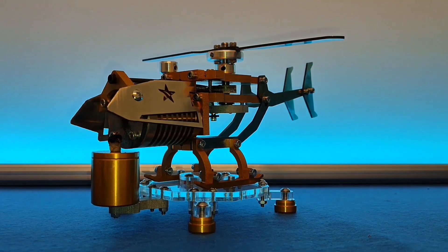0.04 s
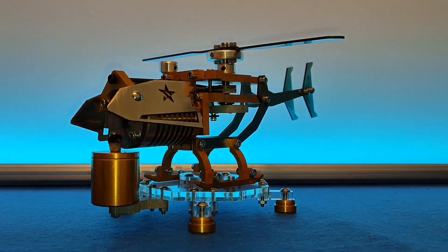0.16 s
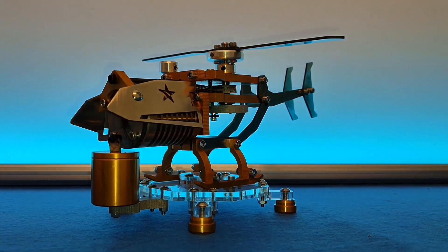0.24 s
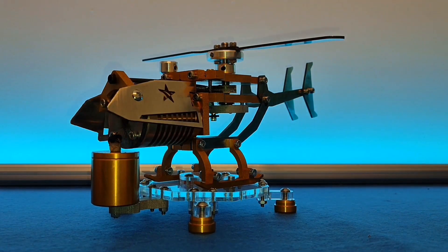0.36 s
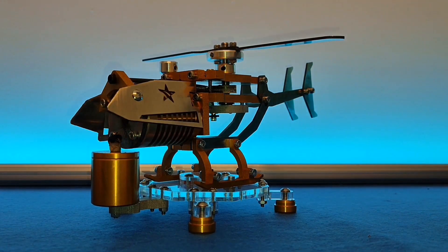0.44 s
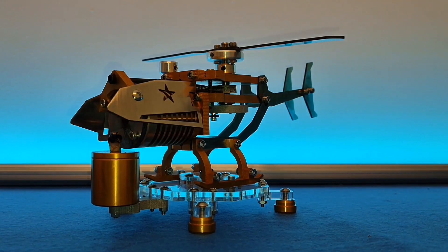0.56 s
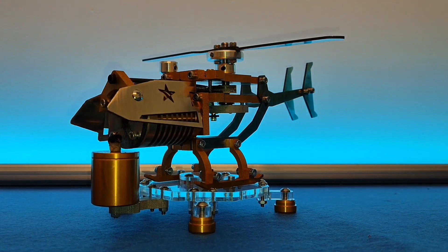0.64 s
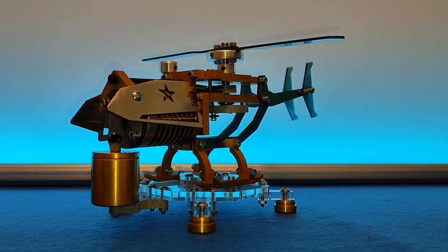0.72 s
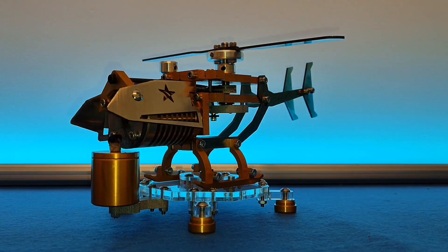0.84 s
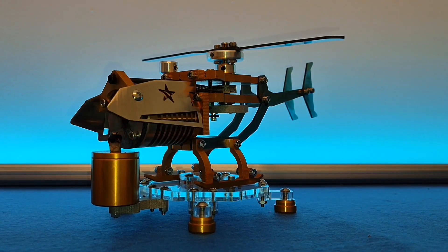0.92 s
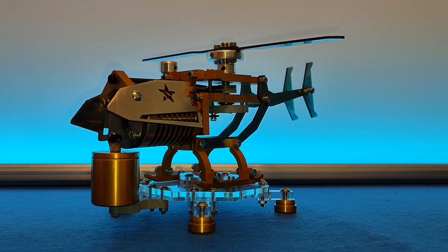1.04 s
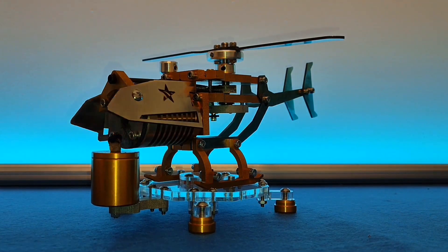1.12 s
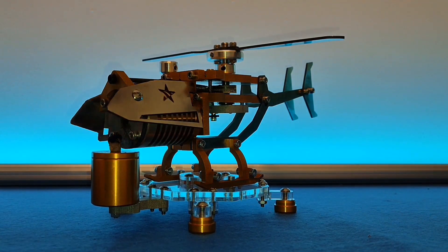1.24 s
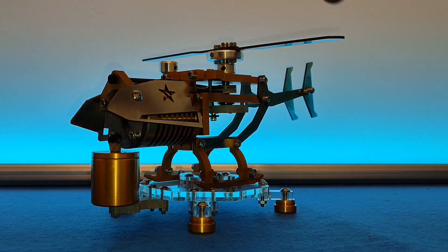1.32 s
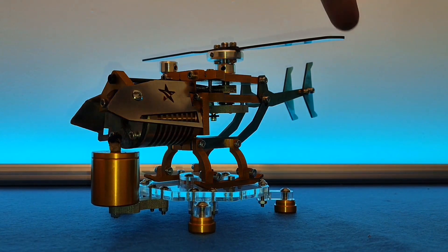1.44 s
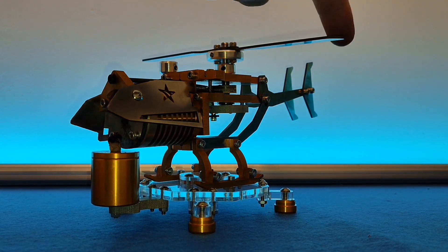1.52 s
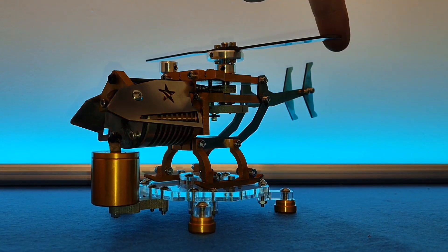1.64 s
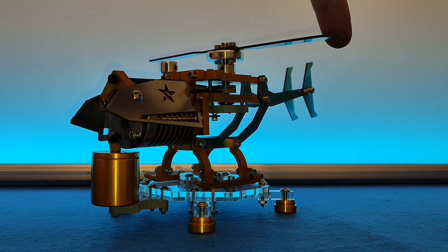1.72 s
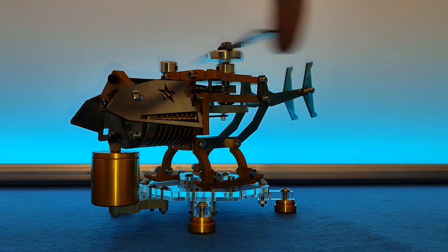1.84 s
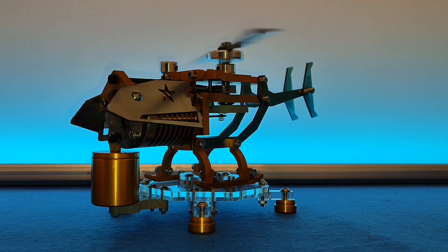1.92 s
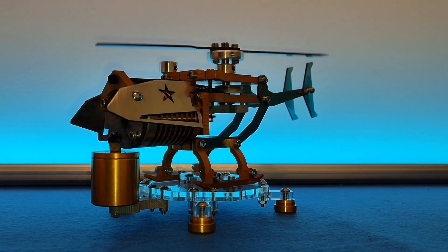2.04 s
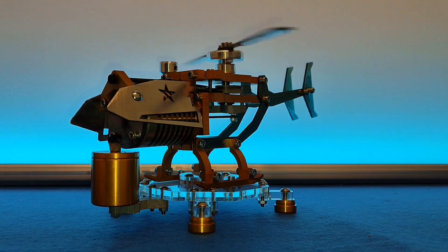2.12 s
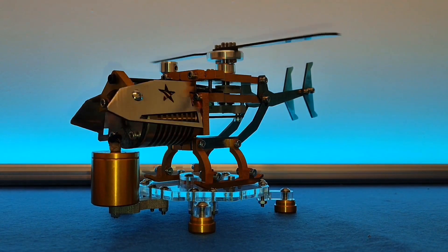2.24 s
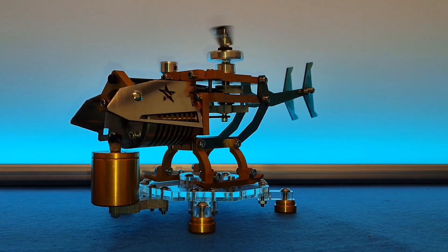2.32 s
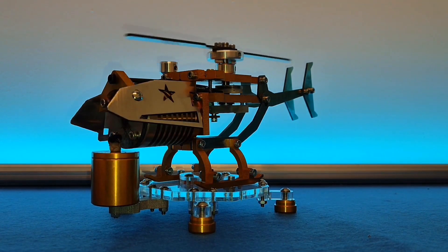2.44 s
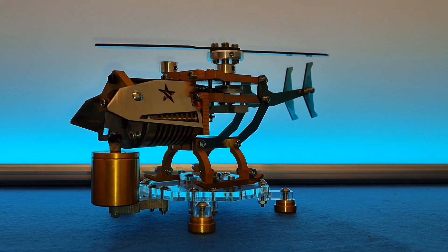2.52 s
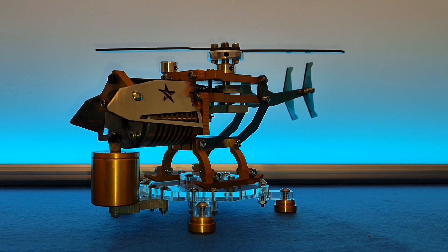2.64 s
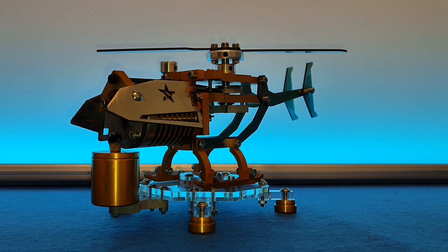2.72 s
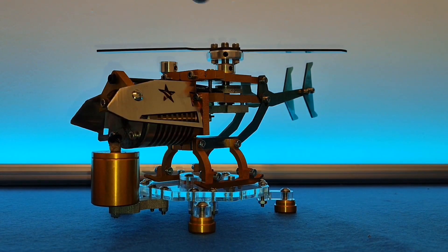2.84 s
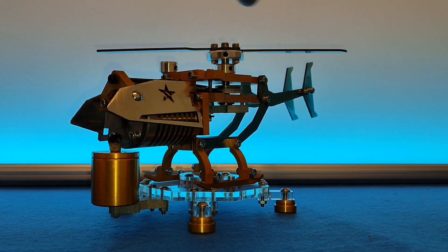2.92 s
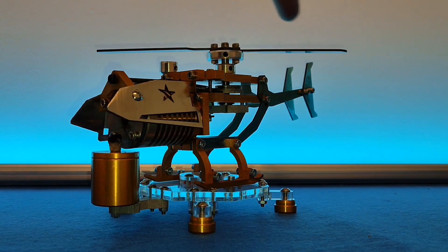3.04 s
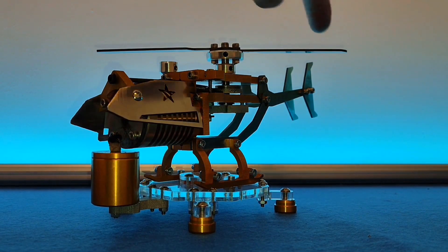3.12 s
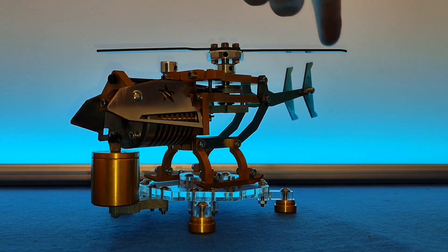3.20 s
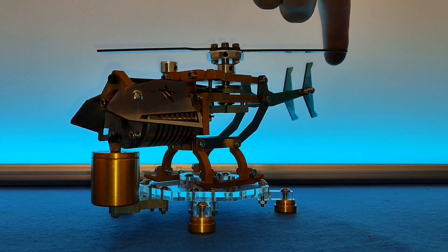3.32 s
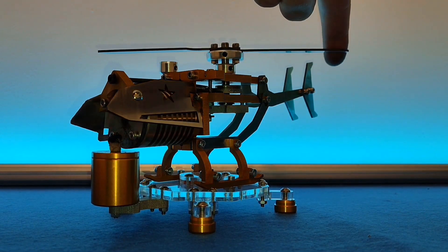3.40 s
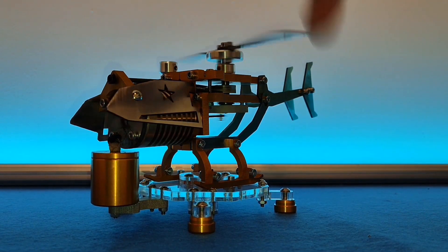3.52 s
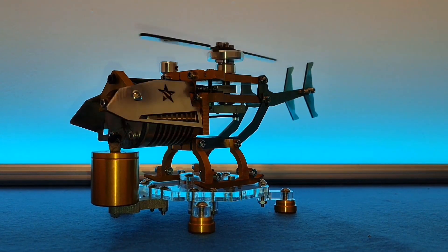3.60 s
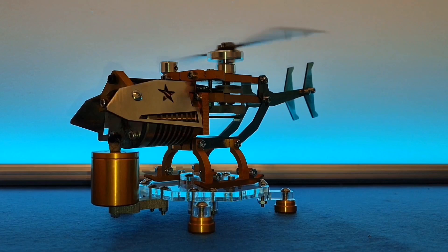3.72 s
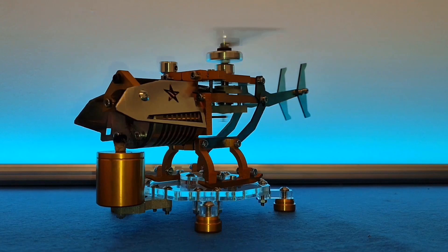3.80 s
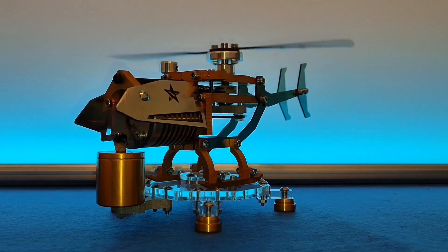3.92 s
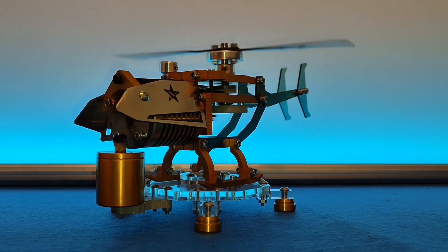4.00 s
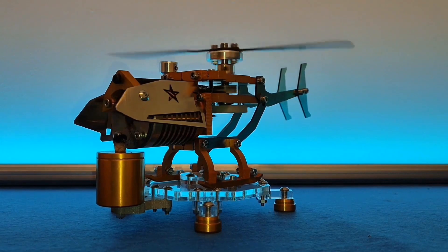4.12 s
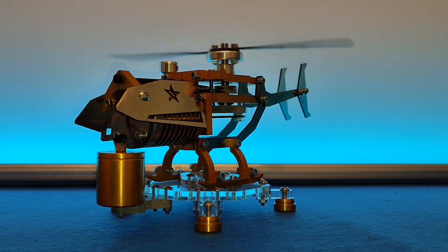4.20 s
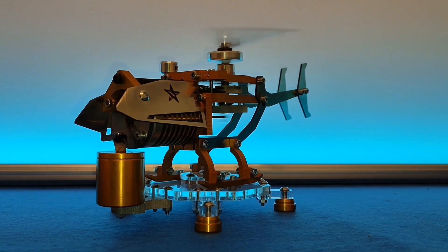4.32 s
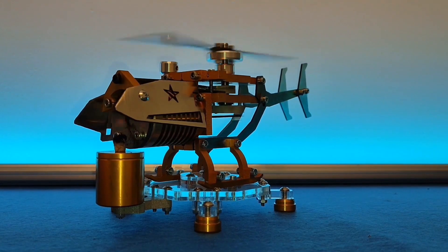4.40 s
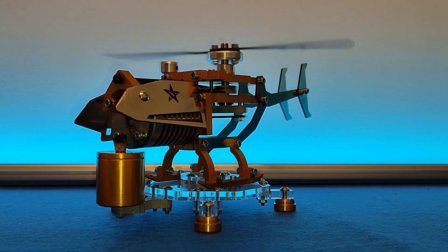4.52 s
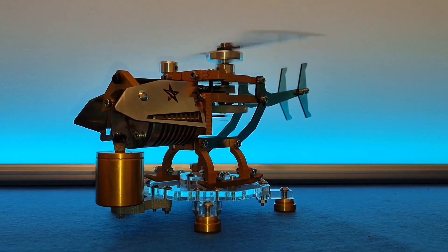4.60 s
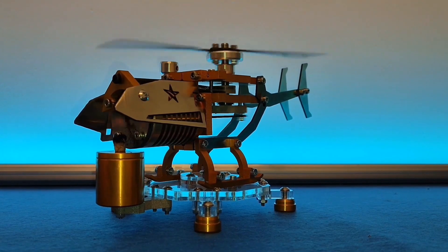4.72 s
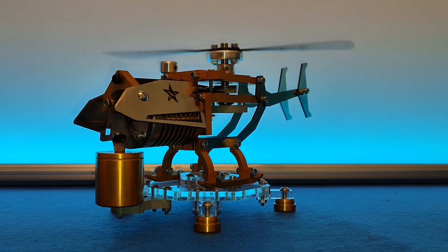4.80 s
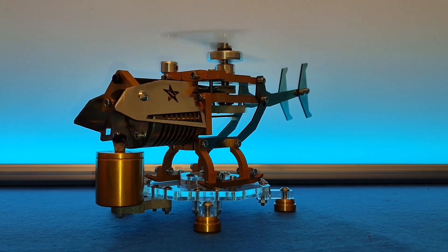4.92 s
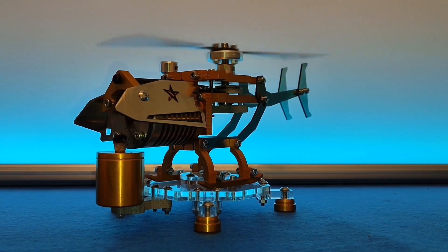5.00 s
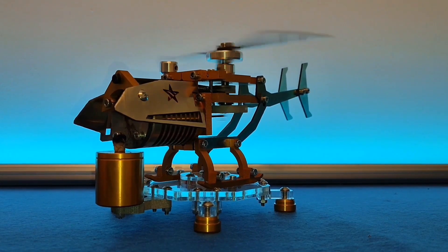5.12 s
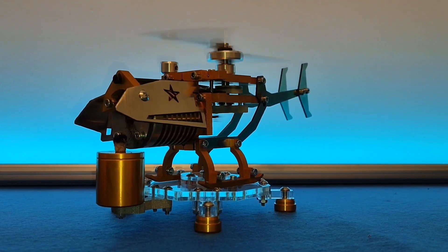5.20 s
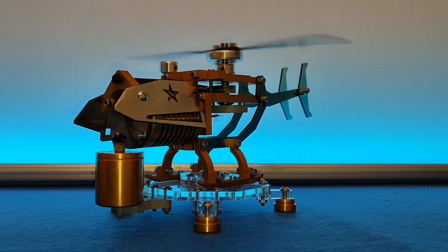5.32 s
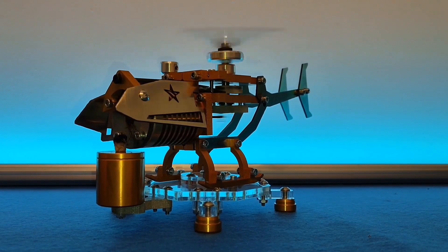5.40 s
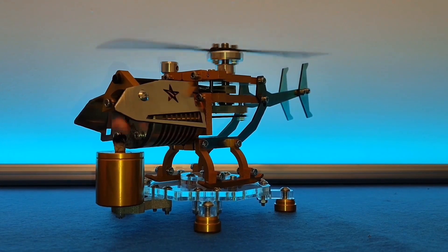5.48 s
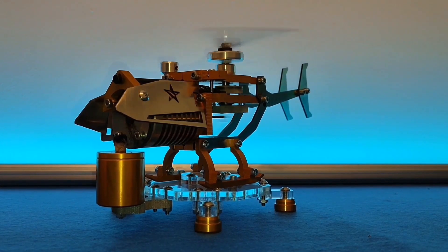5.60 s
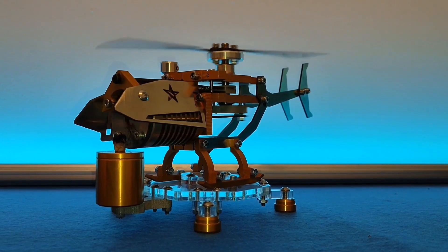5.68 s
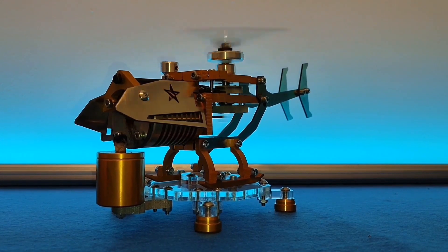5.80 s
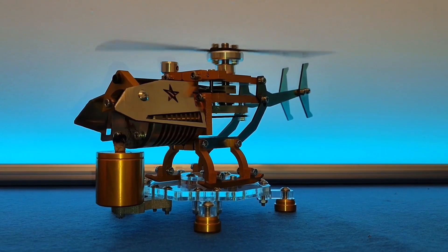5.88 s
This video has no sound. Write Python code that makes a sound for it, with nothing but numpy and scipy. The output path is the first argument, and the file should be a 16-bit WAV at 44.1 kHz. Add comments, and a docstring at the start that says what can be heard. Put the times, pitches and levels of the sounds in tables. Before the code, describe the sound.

Indoors, with a faint low hum and hiss, a hand bumps the tabletop with low, dull thuds. A light touch turns a little engine once: tiny clicks and a soft pop, then quiet. The next push starts it, and dry hollow pops alternate with bright linkage clicks, quickening to about ten turns a second. Close microphones, short room echo, slight metallic ringing and grainy rubbing.

```python
"""Dull knocks on a table, then a finger flicks a small flame-driven model engine: once in vain, then it runs.
Each turn the cylinder port pops open as damped air modes and hot air blasts out as shaped noise.
The valve linkage clacks back two thirds of a turn later: a noise burst, a jolt into the table, a ringing rod.
Grainy rubbing, a hand's brushing, short room echoes, low hum and faint hiss surround it.
Two close ports hear it all."""
import sys
import numpy as np
from scipy import signal
from scipy.fft import rfft, irfft
from scipy.io import wavfile
from scipy.ndimage import uniform_filter1d

SR = 44100
rng = np.random.default_rng(int(sys.argv[2]) if len(sys.argv) > 2 else 0)


def output_pcm(signal):
    """Save a mono or channel-first signal as 16-bit PCM at the path in sys.argv[1].

    Samples are clipped to [-1, 1] before scaling.
    """
    pcm = np.clip(np.atleast_2d(signal).T, -1, 1) * 32767
    wavfile.write(sys.argv[1], SR, np.round(pcm).astype(np.int16))


N = 262395
PADDED = 288000  # samples in the long transforms

# engine turns: port_opens_s, pop_db, blast_after_ms, blast_db, valve_plate_snap_db
TURNS = [(1.908, -23.5, 4.6, -32.5, -21), (3.64, -16, 11, -24, -57), (3.765, -15.5, 10.3, -27.5, -20),
         (3.914, -14, 11, -28, -27), (4.056, -15.5, 11.8, -27, -30), (4.18, -15.5, 10.2, -25.5, -24.5),
         (4.295, -16.5, 11.3, -25, -19.5), (4.405, -19.5, 10.2, -31, -45), (4.513, -19.5, 8.2, -38, -32),
         (4.621, -20.5, 9.5, -32.5, -47), (4.728, -22, 5.5, -48, -29.5), (4.837, -20, 4.3, -40, -50),
         (4.945, -21.5, 9, -31, -26.5), (5.051, -21, 5.5, -31, -31.5), (5.155, -20.5, 7.8, -32.5, -34),
         (5.258, -21, 5.7, -31.5, -38), (5.359, -20.5, 7.9, -31.5, -52), (5.461, -21.5, 7, -47, -44),
         (5.561, -20, 8.6, -38, -35), (5.661, -19.5, 7.3, -42, -27), (5.759, -21, 10.4, -40.5, -31),
         (5.858, -19.5, 8.2, -31.5, -30)]
# modes of the cylinder air: pitch_hz, width_hz, level_db
CYLINDER_MODES = [(235, 74, -12.5), (331, 38, -15), (529.7, 19.6, -13.5), (661, 138, 5), (865, 120, 2),
                  (1529, 200, 0)]
# modes of the thin brass frame in the blast: pitch_hz, width_hz, level_db
FRAME_MODES = [(4820, 260, -10), (5250, 300, -9), (5900, 350, -13), (8500, 600, -12)]
# spectrum of the air jet: freq_hz, density_db
JET_SPECTRUM = [(1200, -17), (2000, -4), (3000, -7), (3700, 0), (4300, -7.5), (4900, 5.5), (5500, 5),
                (7000, -2.5), (8800, -6), (9600, -11), (11800, -6.5), (13800, -6.5), (14500, -34.5),
                (16400, -51)]
# spectrum of the engine body: freq_hz, density_db
BODY_SPECTRUM = [(59, -32.5), (100, -1.5), (446, -3.5), (584, -18.5), (654, -5), (947, -5.5), (1210, -12),
                 (1490, -2), (2260, -5.5), (3000, -13.5), (3900, -13), (6600, -120)]
# spectrum of the valve plate snap: freq_hz, density_db
SNAP_SPECTRUM = [(2000, -7), (5000, -3), (8400, 6.0), (9800, -8.5), (13500, -5), (14800, -48)]
# linkage clacks: start_s, level_db, t60_s
CLACKS = [(1.579, -67, .063), (1.812, -63.5, 0.07), (1.8756, -55, 0.52), (2.1172, -58.5, 0.12),
          (2.1445, -50, 0.058), (2.158, -43.5, 0.14), (2.1844, -48, .19), (2.448, -71, .1),
          (3.496, -64, .13), (3.5097, -54, 0.053), (3.5203, -42.5, 0.049), (3.613, -44.5, 0.036),
          (3.7199, -28.5, 0.1), (3.8471, -33, 0.073), (3.9976, -24.5, 0.024), (4.131, -30, .062),
          (4.2494, -35, 0.093), (4.3653, -38, 0.19), (4.4743, -36, 0.067), (4.5813, -30, .059),
          (4.6892, -30, 0.044), (4.798, -26, 0.026), (4.9054, -35.5, 0.24), (5.0117, -30, .054),
          (5.1147, -30.5, 0.055), (5.22, -30.5, .052), (5.323, -35.5, 0.19), (5.4245, -35.5, 0.11),
          (5.526, -31, 0.056), (5.6253, -35, 0.075), (5.7236, -36, .12), (5.825, -29, 0.039),
          (5.923, -30.5, 0.044)]
# spectrum of the linkage rattle: freq_hz, density_db
RATTLE_SPECTRUM = [(1200, -29), (2000, -15), (2800, 1.5), (4000, -6), (5300, 2.5), (6800, -2), (8400, -6.5),
                   (9700, -12.5), (11600, -6.5), (13900, -13), (14600, -30), (16000, -46.5)]
# table modes under the engine's push: pitch_hz, width_hz, level_db
JOLT_MODES = [(75, 83, 3.9), (140, 15, 1.5), (232.3, 4.2, 7)]
# rod touched at rest: start_s, level_db, t60_s
ROD_TOUCHED = [(1.578, -61, .035), (2.445, -55, .04)]
# spectrum of the rod: freq_hz, density_db
ROD_SPECTRUM = [(1200, -13.5), (1620, -3.5), (1750, 8.0), (1950, 5.0), (2400, -60)]
# bearing and piston rub while the crank turns: time_s, level_db
RUB_CURVE = [(3.5, -53), (3.6, -67.5), (3.635, -51), (3.69, -56), (3.76, -39.5), (3.83, -51.5),
             (4.01, -48.5), (4.24, -42), (4.51, -43.5), (4.85, -44), (5.4, -42), (5.95, -43.5)]
# spectrum of the rub: freq_hz, density_db
RUB_SPECTRUM = [(18, -34), (30, 10), (230, -4), (379, -3), (518, -2.5), (945, -1.5), (1230, -14),
                (1770, -7), (4090, -8.5), (5450, -10.5), (9430, -15), (14000, -15), (15500, -78)]
# knocks on the table, their bounces, and the table ringing as the engine rocks:
# start_s, level_db, brightness_db, lasting_ring_db
KNOCKS = [(0.55, -38.5, -46, -10.5), (0.619, -53.5, -25, 0.5), (0.726, -25.5, -1.5, -11),
          (0.74, -35, -2, -14), (0.783, -29.5, -8.5, -8), (0.797, -41, -3, -7.5), (1.575, -53, -7, -9.5),
          (2.182, -40.5, -23.5, -10), (2.447, -57.5, -22, -3), (3.509, -45.5, -20, -8.5)]
# table modes, the lasting one first, the top one last: pitch_hz, width_hz, level_db
TABLE_MODES = [(229.2, 12, 0), (132, 56, -26.5), (274, 100, -5), (404, 92, 3.5), (555, 100, -3),
               (890, 220, 0)]
# a hand brushes the table, then the rotor: loudest_s, level_db, swell_db_per_s, fade_db_per_s
BRUSH = [(.58, -65, 800, 58.5), (.715, -72, 48, 200), (.728, -52.5, 1600, 262), (.774, -58, 700, 302),
         (.87, -73.5, 300, 25), (1.582, -72.5, 600, 402), (1.816, -65.5, 260.5, 700.5),
         (1.875, -63.5, 1498.5, 1499), (2.14, -61, 501, 300)]
# spectrum of the brushing: freq_hz, density_db
BRUSH_SPECTRUM = [(300, 9), (2000, 2.5), (5500, -1), (7000, -4.5), (14000, -16.5), (14800, -40.5)]
# decay of the room: freq_hz, t60_s
ROOM_DECAY = [(200, 0.43), (530, 0.38), (1390, 0.31), (3680, 0.34), (8000, 0.27), (13000, 0.21)]
# port colouring of the engine: freq_hz, left_minus_right_db
PORTS_TILT = [(60, 0.5), (600, 0.5), (1200, -3.5), (2400, -3), (4000, -1.5), (5100, -9.5), (6800, -1),
              (8300, 15.5), (9300, 5.5), (10400, -0.5), (13000, 1)]
# building hum: pitch_hz, level_db
HUM = [(64, -74), (200, -88.5)]
# spectrum of the quiet floor: freq_hz, density_db
QUIET_SPECTRUM = [(12, -19.5), (25, 1), (45, -7), (70, -5), (125, -15.5), (200, -19.5), (490, -20.5),
                  (730, -25.5), (1950, -29.5), (8000, -38.5), (13900, -42), (14600, -49.5), (16000, -72)]
# left-right likeness of the quiet floor: freq_hz, likeness_0_to_1
QUIET_LIKENESS = [(30, 1), (90, 0.23), (200, 0.37), (1000, 0.017)]

START_S = 3.5  # the second flick, after which the engine runs
LEAK_DB, TOP_MODE_DB = -27, -3  # running: hiss before the port opens; top mode of the pop
IDLE_LEAK_DB, IDLE_TOP_MODE_DB = -38, -40.5  # the same when a finger turns the crank
WEAK_LEAK_DB, WARMS_S = -22, 0.077  # leak deficit at the second flick and its time constant
BLAST_T60_TURNS, SLOWEST_TURN_S, LAST_TURN_S = 1.05, 0.15, 0.12
DRUM_DB, DRUM_T60_TURNS = -36.5, 0.81  # the blast drums on the body
SNAP_RISE_S = 0.00025
USUAL_CLACK_DB = -33
LOW_DB, LOW_DB_PER_DB = -36, 0.82  # low part of a usual clack, and its growth with clack level
JOLT_DB, JOLT_SPREAD_DB, JOLT_DB_PER_DB = -44.5, 1.5, 0.75  # push of a clack into the table
SHOVE_DB = -37.5  # the second flick pushes the engine into the table
ROD_FROM_S = 4.3  # the rod rings once the engine is up to speed
ROD_LEAD_S, ROD_DB, ROD_T60_S, ROD_SPREAD_DB = 0.0185, -32.5, 0.14, 3  # lead before each clack
QUIET_DB = -69.5
LAG_SAMPLES = 10  # the right port hears later
EDGE_HZ = 16300


def gain_of(db):
    """Decibels to a factor."""
    return 10 ** (np.asarray(db) / 20)


def evened(x):
    """Scales to rms 1."""
    return x / np.sqrt(np.mean(x ** 2) + 1e-20)


def read(points, hz):
    """Reads a table on a log-frequency axis."""
    f, value = np.transpose(points)
    return np.interp(np.log(hz + 1), np.log(f + 1), value)


def follow(rows):
    """Gain along a level curve, -120 dB outside it."""
    s, db = np.transpose(rows)
    return gain_of(np.interp(np.arange(N) / SR, s, db, -120, -120))


def coloured(x, points):
    """Filters by a spectrum in dB, keeping the power of white noise."""
    gain = gain_of(read(points, np.fft.rfftfreq(PADDED, 1 / SR)))
    return irfft(rfft(x, PADDED) * evened(gain))[..., :N]


def ports(x):
    """One wave reaches the left port first."""
    return np.array([x, np.roll(x, LAG_SAMPLES)])


def noise(same):
    """White noise at both ports, part of it from the same direction."""
    a, b = rng.standard_normal((2, N))
    same = np.clip(same, 0, 1)
    left, right = ports(a)
    return np.array([left, same * right + np.sqrt(1 - same ** 2) * b])


def ringing(modes, soft_s, lead=0.51):
    """Damped modes started by a blow of some softness, lead radians into the swing; peak 1."""
    t = np.arange(8000) / SR
    ring = np.zeros(len(t))
    for hz, width_hz, db in modes:
        decay = np.exp(-np.pi * width_hz * t)
        ring += gain_of(db) * decay * np.sin(2 * np.pi * hz * t + lead)
    blow = np.exp(-(t[:400] / soft_s - 3) ** 2)
    ring = np.convolve(ring, blow)[:8000]
    return ring / abs(ring).max()


def struck(s, db, sound):
    """Plays one sound at each time and level."""
    train = np.zeros(N)
    np.add.at(train, np.round(s * SR).astype(int), gain_of(db))
    return signal.oaconvolve(train, sound)[:N]


def bursts(s, db, t60_s, rise_s):
    """Envelope of sudden swells that die away."""
    out, t = np.zeros(N + SR // 2), np.arange(SR // 2) / SR
    for start_s, level_db, fall_s in zip(s, db, t60_s * np.ones(len(s))):
        fall = gain_of(level_db - 60 * t / max(fall_s, 0.005))
        out[round(start_s * SR):][:len(t)] += fall * (1 - np.exp(-t / rise_s))
    return out[:N]


def flutter(depth_db, hz):
    """Quick random change of level."""
    return gain_of(depth_db * evened(uniform_filter1d(rng.standard_normal(N), int(SR / hz))))


def patchy(x, depth_db):
    """The colour of the noise shifts in random patches of time and frequency."""
    hz, t, z = signal.stft(x, SR, nperseg=256)
    patches = rng.standard_normal((len(t), len(hz))).T
    patches = uniform_filter1d(patches, size=4, axis=0)
    patches = evened(uniform_filter1d(patches, size=9, axis=1))
    return signal.istft(z * gain_of(depth_db * patches), SR, nperseg=256)[1][:, :N]


def turn_s():
    """Length of each turn."""
    s = np.transpose(TURNS)[0]
    return np.minimum(np.diff(s, append=s[-1] + LAST_TURN_S), SLOWEST_TURN_S)


def pops():
    """The cylinder air rings briefly as the port opens; its top mode is weak until the engine runs."""
    s, db = np.transpose(TURNS)[:2]
    top_mode_db = np.where(s > START_S, TOP_MODE_DB, IDLE_TOP_MODE_DB)
    luck = rng.standard_normal((len(s), len(CYLINDER_MODES) + 1))
    pop = np.zeros(N)
    for start_s, level_db, top_db, chance in zip(s, db, top_mode_db, luck):
        modes = np.array(CYLINDER_MODES, float)
        modes[:, 0] *= 1 + 0.024 * chance[:-1]  # each mode shifts a little in pitch at random
        low = gain_of(1.5) * ringing(modes[:-1], soft_s=0.00021, lead=1.795)
        top = gain_of(top_db + 2.2 * chance[-1]) * ringing(modes[-1:], soft_s=0.00019, lead=1.55)
        part = pop[round((start_s + 0.0012) * SR):][:len(low)]
        part += gain_of(level_db) * (low + top)[:len(part)]
    return ports(pop)


def leaks():
    """Air hisses just before the port is open, growing to full level after the second flick."""
    s = np.transpose(TURNS)[0]
    db = np.where(s > START_S, LEAK_DB, IDLE_LEAK_DB)
    db = db + WEAK_LEAK_DB * np.exp(-abs(s - START_S) / WARMS_S)
    return coloured(noise(0.24) * bursts(s - 0.007, db, 0.084, rise_s=0.0049), JET_SPECTRUM)


def blasts():
    """Turbulent air, uneven, shakes the thin frame and drums on the body."""
    s, _, after_ms, db, _ = np.transpose(TURNS)
    s = s + after_ms * 1e-3
    air = noise(0.13) * flutter(2.18, 292) * bursts(s, db, BLAST_T60_TURNS * turn_s(), rise_s=0.00071)
    brass = ringing(FRAME_MODES, soft_s=0.00002)
    frame = signal.oaconvolve(air, brass[None] / np.linalg.norm(brass))[:, :N]
    drum = bursts(s, np.full(len(s), DRUM_DB), DRUM_T60_TURNS * turn_s(), rise_s=0.0021)
    body = coloured(noise(0.54) * drum, BODY_SPECTRUM)
    return coloured(air, JET_SPECTRUM) + gain_of(-14.5) * frame + body


def snaps():
    """The valve plate snaps as each blast starts: a short bright noise burst."""
    s, _, after_ms, _, db = np.transpose(TURNS)
    snap = bursts(s + after_ms * 1e-3, db, 0.018, rise_s=SNAP_RISE_S)
    return coloured(noise(0.22) * snap, SNAP_SPECTRUM)


def clacks():
    """The linkage rattles shortly, sounds the body and pushes into the table."""
    s, db, t60_s = np.transpose(CLACKS)
    over_db = db - USUAL_CLACK_DB
    rattle = noise(0.16) * flutter(0.5, 600) * bursts(s, db, t60_s, rise_s=0.00024)
    low = bursts(s, LOW_DB + LOW_DB_PER_DB * over_db, t60_s * 0.97, rise_s=0.0005)
    body = coloured(noise(0.35) * low, BODY_SPECTRUM)
    jolt_db = JOLT_DB + JOLT_DB_PER_DB * over_db + JOLT_SPREAD_DB * rng.standard_normal(len(s))
    push_s, push_db = np.append(s - 0.004, START_S + 0.0058), np.append(jolt_db, SHOVE_DB)
    jolt = struck(push_s, push_db, ringing(JOLT_MODES, soft_s=0.0017, lead=0.37))
    return coloured(rattle, RATTLE_SPECTRUM) + body + ports(jolt)


def rod():
    """A rod rings on its own, as a narrow band of noise, ahead of each fast clack and when touched."""
    s = np.transpose(CLACKS)[0]
    s = s[s > ROD_FROM_S]
    db = ROD_DB + ROD_SPREAD_DB * rng.standard_normal(len(s))
    ring = bursts(s - ROD_LEAD_S, db, ROD_T60_S, rise_s=0.01)
    ring = ring + bursts(*np.transpose(ROD_TOUCHED), rise_s=0.0031)
    return coloured(noise(0.88) * ring, ROD_SPECTRUM)


def rubbing():
    """Grainy friction noise; loose joints tick, each tick ringing one small part at its own pitch."""
    rub = coloured(noise(0.32) * flutter(2.8, 150), RUB_SPECTRUM)
    happens = rng.random(N) < 300 / SR  # 300 ticks per s on average
    size = gain_of(4 * np.minimum(rng.exponential(1, N), 3)) * happens
    part, t, ticks = rng.integers(0, 16, N), np.arange(300) / SR, np.zeros((2, N))
    for k, hz in enumerate(np.geomspace(1900., 9000., num=16)):
        ring = gain_of(-60 * t / 0.006) * np.sin(2 * np.pi * hz * t)
        port_gains = rng.uniform(-1.52, 1, (2, 1))
        ticks += signal.oaconvolve(size * (part == k), ring)[:N] * port_gains
    return (rub + gain_of(-16) * evened(ticks)) * follow(RUB_CURVE)


def knocks():
    """The table thuds when knocked or rocked on; brightness sets its top mode, and one low mode lasts."""
    s, db, bright_db, last_db = np.transpose(KNOCKS)
    low = struck(s + 0.00017, db + 1.5, ringing(TABLE_MODES[1:-1], soft_s=0.00061, lead=-2.7))
    high = struck(s + 0.0013, db + bright_db, ringing(TABLE_MODES[-1:], soft_s=0.00045, lead=0.3))
    lasting = struck(s, db + last_db, ringing(TABLE_MODES[:1], soft_s=0.00076, lead=0.58))
    return low * gain_of([[1.5], [-1.5]]) + high + lasting  # low modes lean to the left port


def brush():
    """The hand's friction noise: each touch swells and fades."""
    t = np.arange(N) / SR
    touches = np.zeros(N)
    for s, db, swell, fade in BRUSH:
        touches += gain_of(db + np.minimum(swell * (t - s), fade * (s - t)))
    return coloured(noise(0.29) * touches * flutter(2.5, 120), BRUSH_SPECTRUM)


def room(x):
    """Sparse taps of random sign, one in every 20 samples, each band dying at its own speed."""
    taps = np.zeros((2, SR // 2))
    at = np.arange(200, SR // 2 - 20, 20)
    at = at + rng.integers(0, 20, (2, len(at)))
    np.put_along_axis(taps, at, rng.choice([-1., 1.], at.shape), 1)
    hz, t, z = signal.stft(taps, SR, nperseg=256)
    decay = gain_of(-60 * t / read(ROOM_DECAY, hz)[:, None])
    tail = signal.istft(z * decay, SR, nperseg=256)[1]
    return signal.fftconvolve(x, tail / np.linalg.norm(tail[0]), axes=1)[:, :N]


def hum():
    """Steady low tones from the building, wavering a little in pitch and level."""
    waver = evened(uniform_filter1d(rng.standard_normal(N), 6000))
    clock_s = np.cumsum(1 + 0.016 * waver) / SR
    tones = np.zeros(N)
    for hz, db in HUM:
        tones += gain_of(db) * np.sqrt(2) * np.sin(2 * np.pi * hz * clock_s) * flutter(3.1, 3.3)
    return tones


def quiet():
    """Low rumble over the faint hiss of the microphone, more alike at both ports in the bass."""
    frames, hz = N // 512 + 5, np.fft.rfftfreq(2048, 1 / SR)
    a, b, c, d = rng.standard_normal((frames, 1025, 4)).T
    same = np.clip(read(QUIET_LIKENESS, hz), 0, 1)[:, None]
    left, other = a + 1j * b, c + 1j * d
    z = np.array([left, same * left + np.sqrt(1 - same ** 2) * other])
    z = z * gain_of(read(QUIET_SPECTRUM, hz))[:, None]
    floor = signal.istft(z, nperseg=2048, noverlap=1536)[1][:, :N]
    return gain_of(QUIET_DB) * evened(floor)


def scene():
    """Engine and table in the room, heard through the two ports, over the quiet floor."""
    near = pops() + leaks() + clacks() + rod() + patchy(blasts() + snaps() + rubbing(), depth_db=3.0)
    table = knocks() + brush()
    hz = np.fft.rfftfreq(PADDED, 1 / SR)
    tilt_db = read(PORTS_TILT, hz) / 2  # each port colours the engine its own way
    engine = near + gain_of(-9) * patchy(room(near), depth_db=2.5)
    heard = rfft(engine, PADDED) * gain_of([tilt_db, -tilt_db])
    heard = heard + rfft(table + gain_of(-7.0) * room(table), PADDED)
    apart = hz ** 2 / (hz ** 2 + 210.0 ** 2)  # long waves press on both ports alike
    mid = heard.mean(0)
    heard = mid + apart * (heard - mid)
    heard = heard * hz ** 2 / np.hypot(hz ** 2, 69.0 ** 2)  # small things radiate no deep bass
    return irfft(heard)[:, :N] + hum() + quiet()


def record(dry):
    """Steep linear-phase low-pass at EDGE_HZ."""
    lowpass = signal.firwin(511, EDGE_HZ, window=("kaiser", 9), fs=SR)
    return signal.oaconvolve(dry, lowpass[None], "same")


dry = scene()
out = record(dry)
output_pcm(out)
```